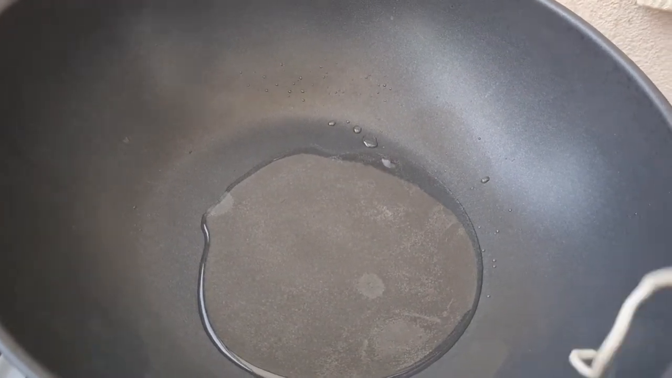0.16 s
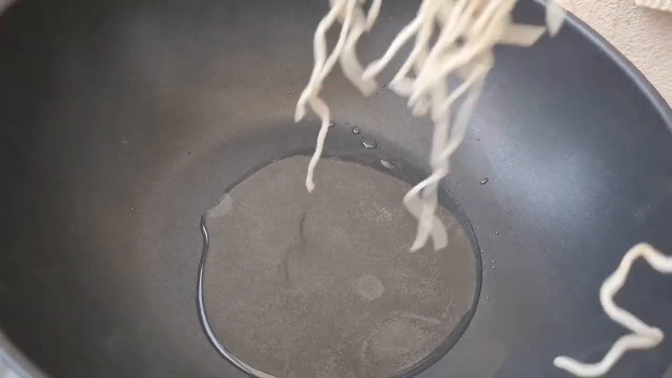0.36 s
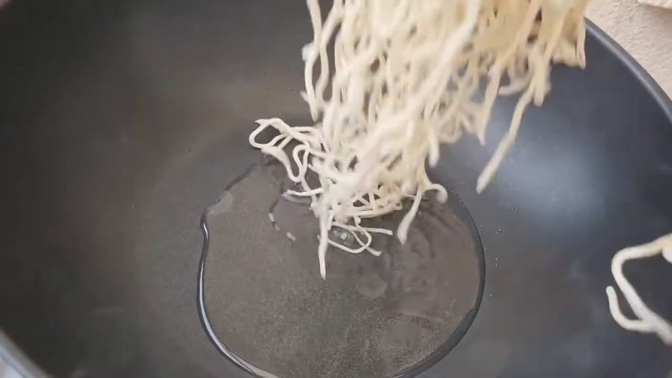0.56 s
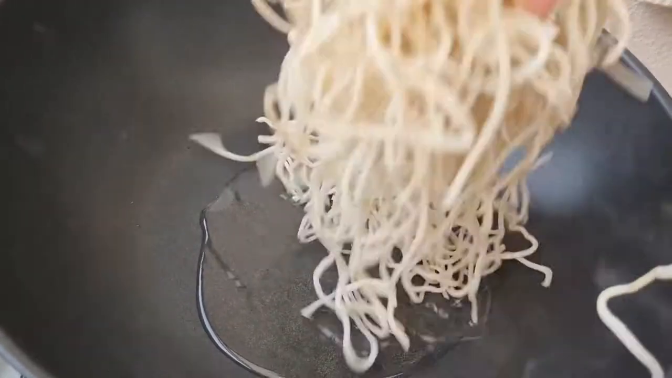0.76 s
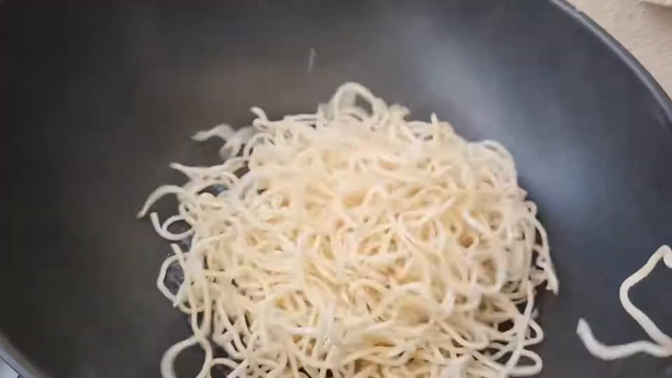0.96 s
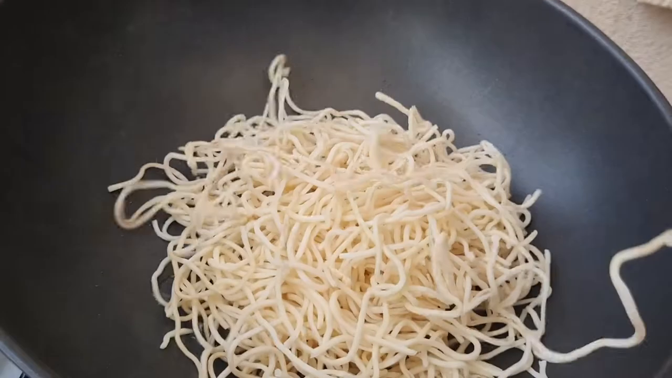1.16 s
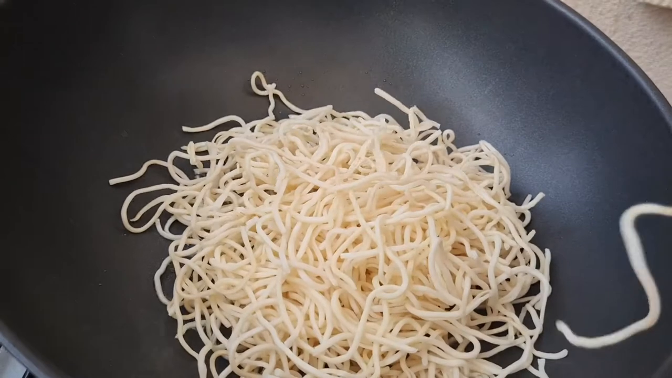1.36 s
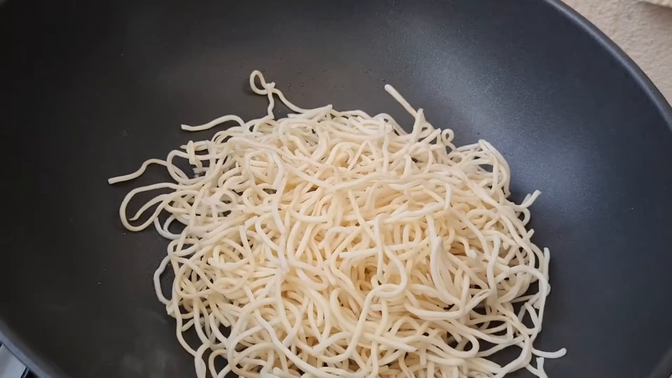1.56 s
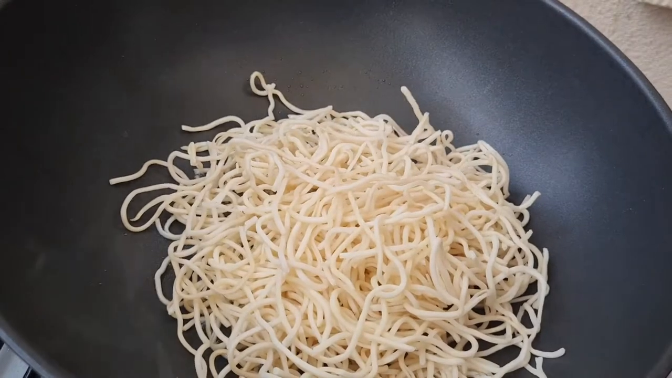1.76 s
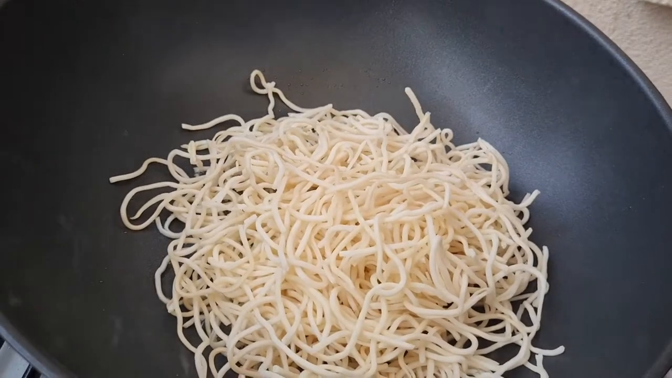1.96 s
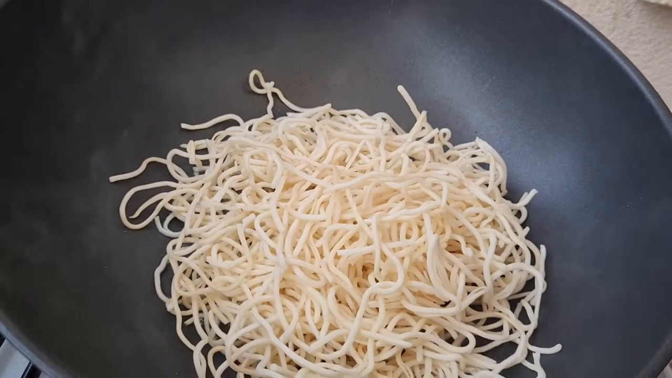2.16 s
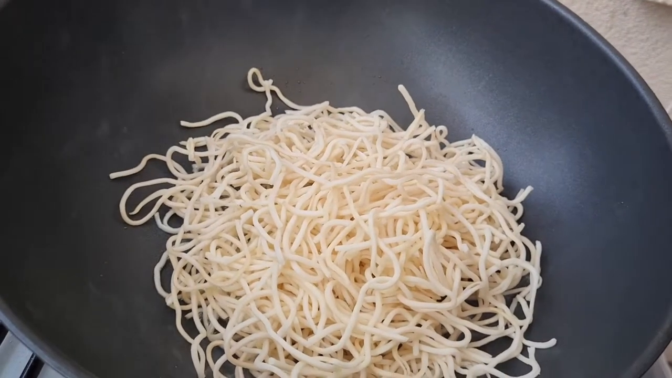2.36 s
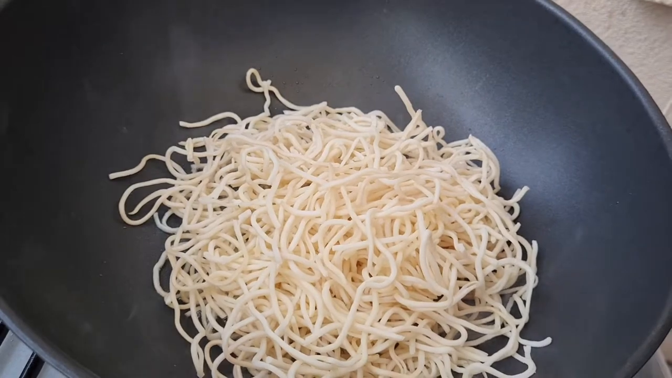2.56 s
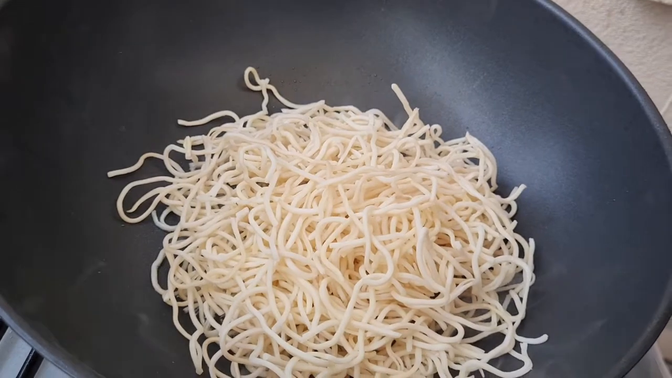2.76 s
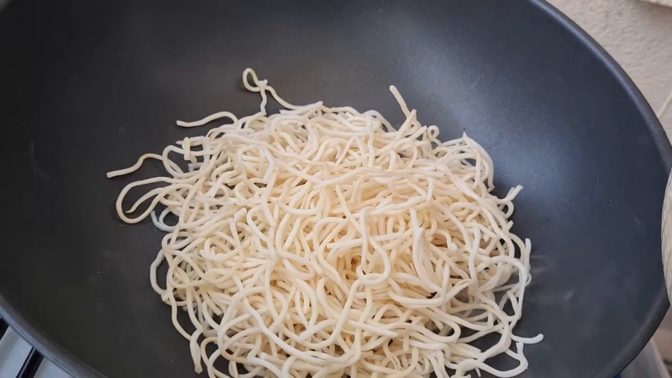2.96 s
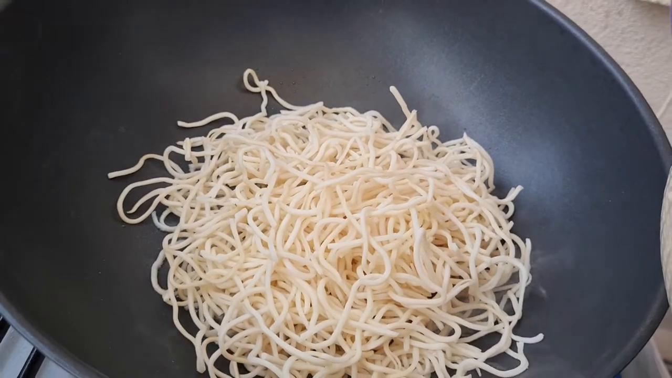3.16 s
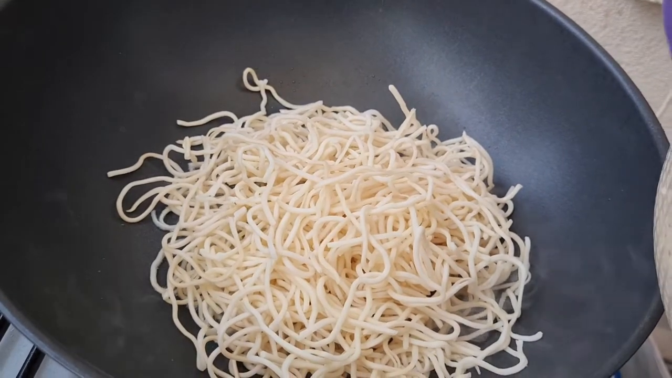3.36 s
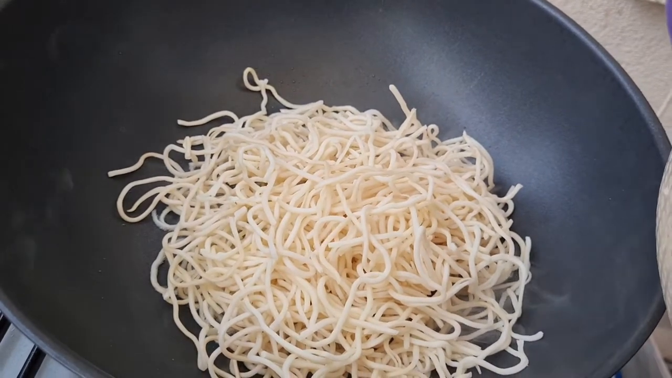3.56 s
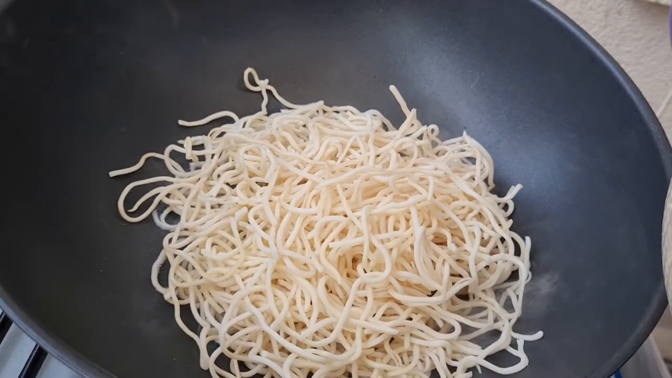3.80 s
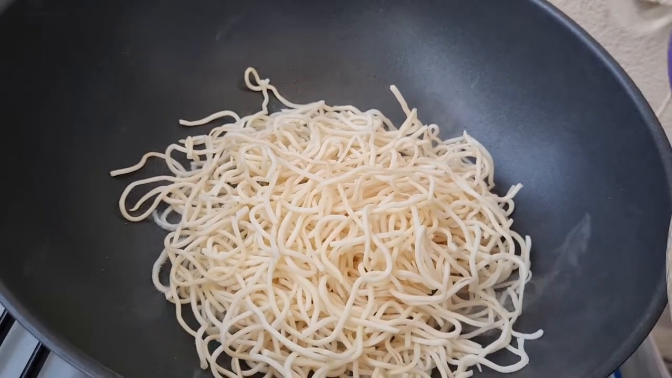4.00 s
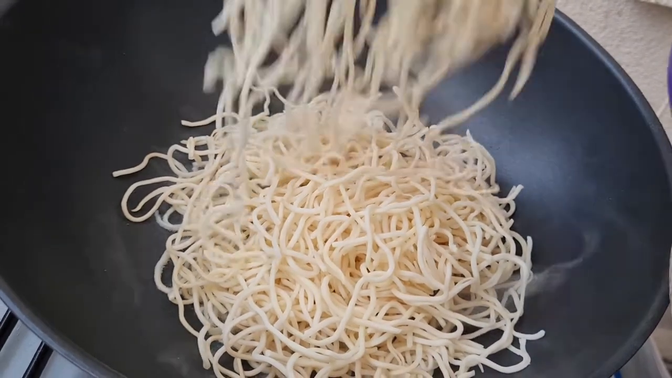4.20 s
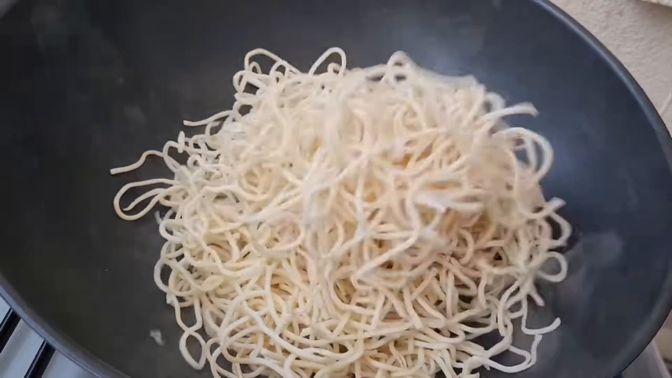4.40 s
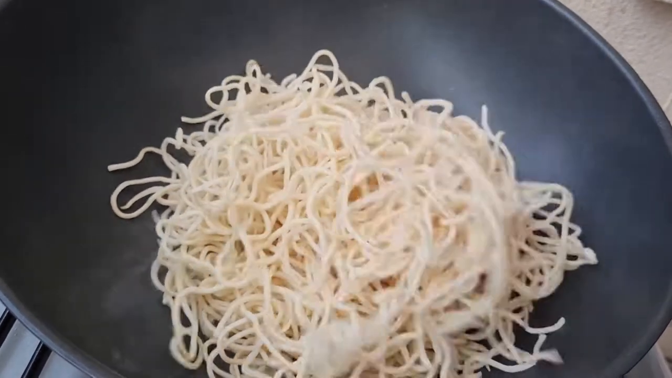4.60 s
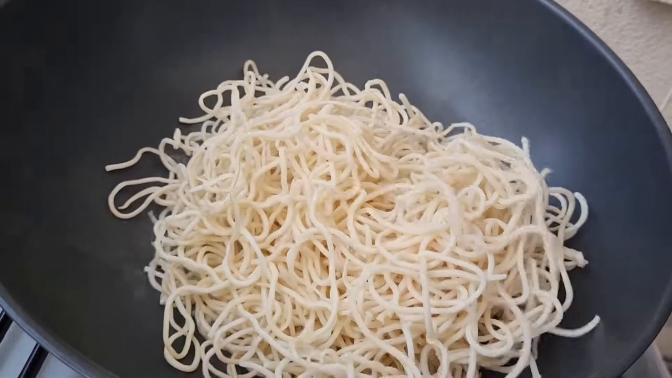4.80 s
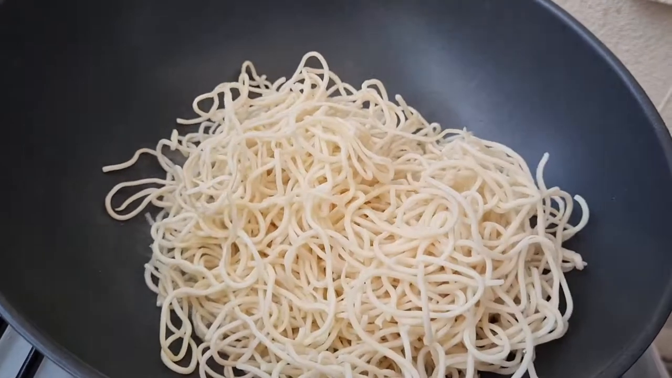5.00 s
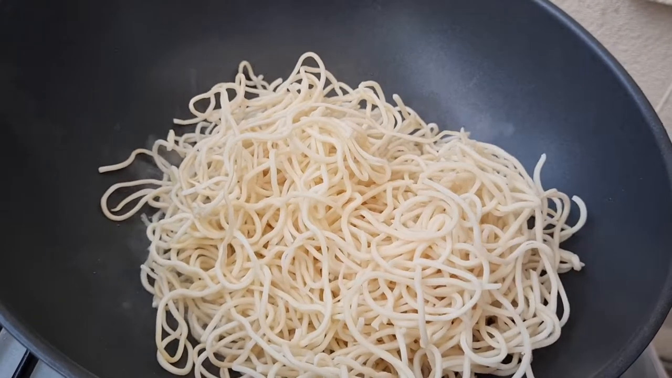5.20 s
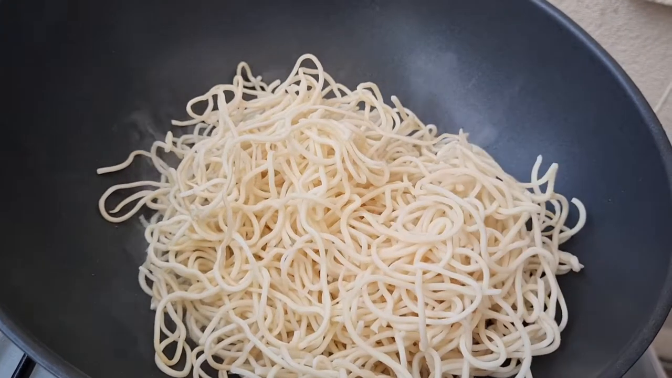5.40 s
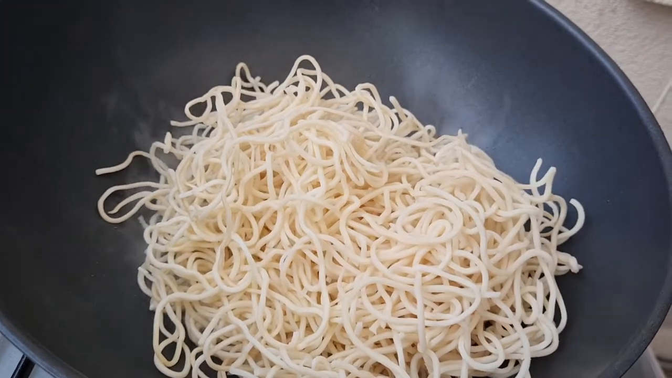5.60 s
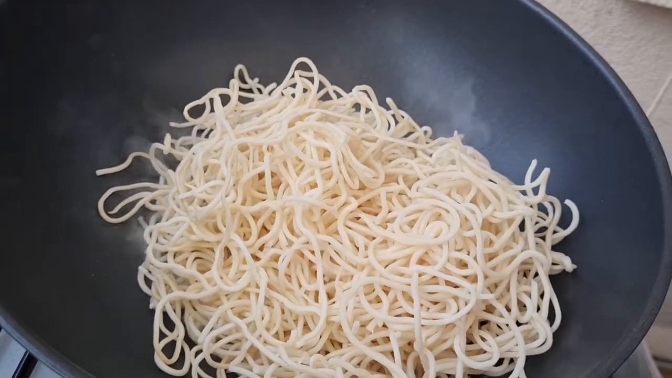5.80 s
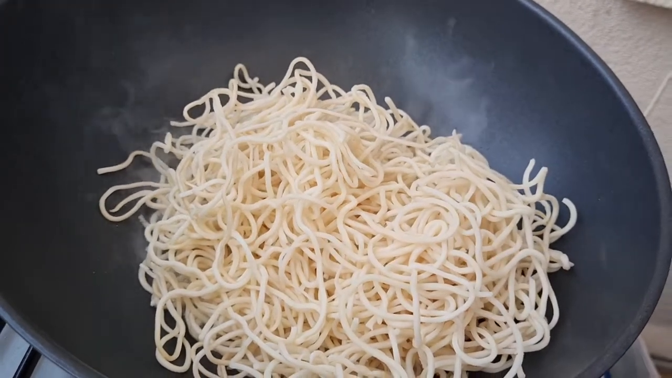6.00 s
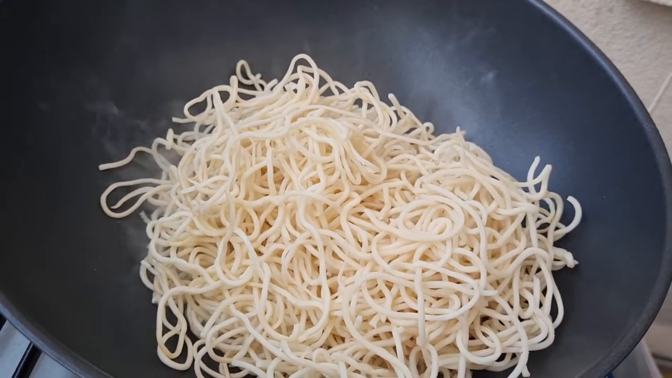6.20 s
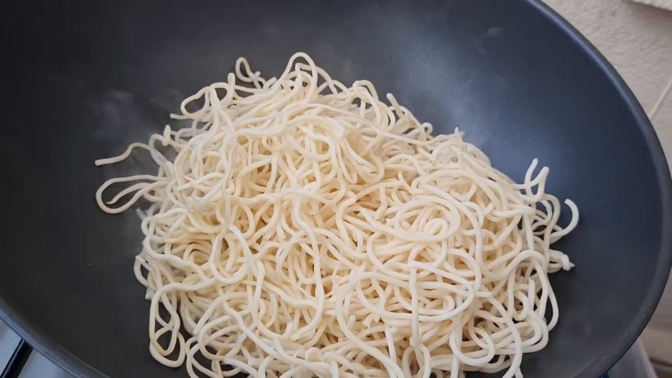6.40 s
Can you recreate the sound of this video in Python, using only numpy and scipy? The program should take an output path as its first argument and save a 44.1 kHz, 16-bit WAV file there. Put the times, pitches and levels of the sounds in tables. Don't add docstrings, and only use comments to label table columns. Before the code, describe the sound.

A home kitchen heard very close in stereo. For nearly the first second there is only a soft, low extractor and gas-flame hum, with a faint hiss at about 0.2 s and several quick, growing hisses from 0.55 s as strands touch the oil. At about 1 s the wet noodle heap lands: a dull low pan thud and an abrupt bright rush of steam. Sizzling builds quickly to full strength by 1.5 s, fine crackle over a coarser bubbling boil. Sharp millisecond spits, mostly leftward, and short liquid pops stay scattered throughout. Low pan thuds come at 2.3 and 3 s. The sizzle catches momentarily near 3.25 s and thins around 4 s. At 4.35 s a second handful makes the boil swell, with a strong pop and faint thud near 4.6 s. It dips around 5.3 s, then continues crackling, gradually softening, until 6.4 s.

```python
import sys
import numpy as np
from scipy import signal
from scipy.fft import rfft, irfft, next_fast_len
from scipy.io import wavfile

SR = 44100
rng = np.random.default_rng(int(sys.argv[2]) if len(sys.argv) > 2 else 0)


def field_ratio(decibels):
    return 10 ** (np.asarray(decibels, dtype=float) / 20)


def store_pcm(level_fs):
    pcm = np.round(np.clip(level_fs, -1, 1) * 32767).astype(np.int16)
    wavfile.write(sys.argv[1], SR, np.atleast_2d(pcm).T)


N = 284445


def rms_one(x):
    return x / np.sqrt(np.mean(x ** 2) + 1e-20)


def in_time(rows):
    s, *columns = np.transpose(rows)
    return [np.interp(np.arange(N) / SR, s, c) for c in columns]


def at_hz(points, hz):
    hz_points, values = np.transpose(points)
    return np.interp(np.log(hz), np.log(hz_points), values)


def drift(rate):
    r = np.exp(-2 * np.pi * rate * 40 / SR)
    white = rng.standard_normal(N // 40 + 2002)
    slow = signal.lfilter([1], [1, -2 * r, r * r], white)[2000:]
    return np.interp(np.arange(N) / 40, np.arange(len(slow)), rms_one(slow))


def dying(clicks, t60):
    return signal.lfilter([1], [1, -field_ratio(-60 / (t60 * SR))], clicks + 1e-18)


# frequency in Hz, correlation from 0 to 1.
LIKENESS = [(60, 0.5), (180, 0.84), (550, 0.58), (1650, 0.46), (4970, 0.043), (15000, 0.14)]
# frequency in Hz, left over right in dB.
LEAN = [(60, -1), (150, 3.5), (380, 0.5), (950, 3.5), (2380, 3), (5980, 2), (15000, 10)]


def stereo(mid, side, hz):
    alike = np.clip(at_hz(LIKENESS, hz), -1, 1)
    pair = np.sqrt(1 + alike) * mid + np.sqrt(1 - alike) * side * [[1], [-1]]
    return pair * field_ratio(at_hz(LEAN, hz) * np.array([[.5], [-.5]]))


def wash(spectrum):
    size = next_fast_len(N)
    hz = np.arange(size // 2 + 1) * SR / size + 1e-3
    mid, side = rfft(rng.standard_normal((2, size)))
    coloured = stereo(mid, side, hz) * field_ratio(at_hz(spectrum, hz))
    return rms_one(irfft(coloured, size)[:, :N])


def bank(spectrum, patchy_db, patch_rate, gate):
    out, edges = 0, 22 * 2 ** np.arange(0, 9.7, .5)
    white = rng.standard_normal((2, 2, N))
    for k, (low, high) in enumerate(zip(edges, edges[1:])):
        hz = np.sqrt(low * high)
        if not .7 * spectrum[0][0] < hz < 1.3 * spectrum[-1][0]:
            continue
        mid, side = white[k % 2]
        sos = signal.butter(2, [low, high], "band", fs=SR, output="sos")
        band = signal.sosfilt(sos, stereo(mid, side, hz) * gate(hz))
        out = out + field_ratio(at_hz(spectrum, hz) + patchy_db * drift(patch_rate)) * band
    return rms_one(out)


# frequency in Hz, density in dB per Hz.
HUM = [(15, -44), (25, -11), (37, -18), (59, -8.5), (76, -11.5), (180, -18.5), (245, -13.5), (400, -23.5),
       (872, -4.5), (1120, -14.5), (1400, -6.5), (1640, -30), (1900, -29), (2470, -64), (4180, -120)]
# frequency in Hz, density in dB per Hz.
SEETHE = [(1700, -40), (2000, -8), (2400, -14), (4000, -15), (4400, -1), (5300, -0.5), (6200, -11),
          (7600, -6), (8300, -6), (8850, -6), (9500, -14), (10250, 0), (11200, -11), (15400, -16)]
# time in seconds, level in dB.
RUMBLE = [(0.0, -73), (2.24, -67), (2.32, -48), (2.73, -67), (3.09, -48.5), (3.16, -65.5), (5.06, -56.5),
          (5.14, -67), (5.86, -54), (6.45, -68)]
HUM_DB, SEETHE_DB = -64, -72.5


def hum():
    (rumble_db,) = in_time(RUMBLE)
    sos = signal.butter(2, [45, 60], "band", fs=SR, output="sos")
    flutter = signal.sosfilt(sos, rng.standard_normal(N))
    air = field_ratio(HUM_DB + 0.67 * drift(8.3)) * wash(HUM)
    seethe = field_ratio(SEETHE_DB) * wash(SEETHE)
    return air + seethe + field_ratio(rumble_db - 8.0) * rms_one(flutter)


def kitchen(x):
    t60_s, wall_cut_hz = 0.2, 14000
    size = next_fast_len(N + SR)
    hz = np.arange(size // 2 + 1) * SR / size
    dull = 1 / (1 + 1j * hz / wall_cut_hz)
    out = np.zeros((2, len(hz)), complex)
    for k, lag in enumerate(rng.uniform(.003, 0.023, 10)):
        turn = field_ratio(-60 * lag / t60_s) * dull * np.exp(-2j * np.pi * hz * lag)
        out[k % 2] += turn / (1 - turn) * (-1) ** (k // 2)
    return irfft(out * rfft(x, size), size)[:, :N]


# frequency in Hz, width in Hz, gain in dB.
COMB = [(125, 27, 4), (183, 66, -7), (235, 12, 7), (305, 11, 5.5), (391, 106, -11), (424.5, 26, 6),
        (918, 50, 3.5), (1125, 116, -11.5), (1640, 53, -3), (1993, 36, 2), (7720, 770, 3)]


def comb(x):
    for hz, width_hz, gain_db in COMB:
        r = np.exp(-np.pi * width_hz / SR)
        zeros = np.array([1, 0, -1]) * (1 - r * r) / 2
        poles = [1, -2 * r * np.cos(2 * np.pi * hz / SR), r * r]
        x = x + (field_ratio(gain_db) - 1) * signal.lfilter(zeros, poles, x)
    return x


def bursts(events, spectrum, rise_s):
    t, shape = np.arange(N) / SR, 0
    for s, peak_db, t60 in events:
        decay = field_ratio(peak_db - 60 * np.clip(t - s, 0, 9) / t60)
        shape = shape + decay * np.clip((t - s) / rise_s, 0, 1)
    return shape * field_ratio(1.3 * drift(150)) * wash(spectrum)


# start in seconds, peak in dB, 60 dB decay in seconds.
THUDS = [
    (0.98, -53.5, 1),
    (2.292, -49.5, 0.68),
    (2.963, -51.5, 0.85),
    (4.576, -64, 0.53),
]
# frequency in Hz, density in dB per Hz.
THUD = [(24, -32), (40, -5), (119, 1), (212, 0.5), (304, -6), (399, -1.5), (600, -7), (780, -29),
        (1320, -120)]


def thuds():
    return bursts(THUDS, THUD, rise_s=0.0056)


# start in seconds, peak in dB, 60 dB decay in seconds.
TOUCHES = [(.165, -69, 0.35), (.545, -72, 0.35), (.635, -69, 0.11), (.66, -76, 0.19), (.74, -70, .1),
           (.797, -63, 0.2), (.813, -53.5, 0.29), (.865, -60.5, 0.48), (.916, -55.5, .5), (.945, -62, .3),
           (.962, -51, .2)]
# frequency in Hz, density in dB per Hz.
TOUCH = [(1060, -38), (1800, -13), (2580, -14), (3790, -6.5), (4260, 0), (5430, -3), (6050, -6),
         (7850, -10), (15400, -20)]


def touches():
    return bursts(TOUCHES, TOUCH, rise_s=0.0022)


# start in seconds, peak in dB, 60 dB decay in seconds.
FLASHES = [
    (.9775, -28, 0.18),
    (.9775, -29.5, 0.42),
]
# frequency in Hz, density in dB per Hz.
FLASH = [(1180, -53), (2000, -27), (2910, -17.5), (3090, -27), (3400, -9.5), (3670, -13), (4100, -4.5),
         (6960, -1.5), (15400, -20)]


def flashes():
    return bursts(FLASHES, FLASH, rise_s=0.00047)


# start in seconds, peak in dB, pitch in Hz.
POPS = [(1.212, -34, 2450), (1.283, -38, 2070), (1.415, -33, 1610), (1.468, -29, 2060), (1.776, -21, 1040),
        (2.183, -27, 1790), (2.531, -27, 1790), (2.641, -21.5, 1900), (3.003, -31, 2360),
        (3.161, -37, 2040), (3.421, -31, 1460), (3.641, -26.5, 1650), (3.889, -26, 2370), (4.243, -35, 960),
        (4.585, -26, 1490), (4.591, -33, 1550), (4.629, -16.5, 1980), (4.786, -26, 2330),
        (4.821, -21, 2380), (5.025, -30, 1350), (5.12, -22, 2380), (5.555, -36, 2550), (5.612, -27, 2230),
        (5.7, -21, 2020), (6.112, -22.5, 2160), (6.151, -25.5, 1330)]


def pops():
    out, t = np.zeros(N + 2048), np.arange(2048) / SR
    luck = rng.standard_normal((len(POPS), 2048))
    for (s, peak_db, hz), noise in zip(POPS, luck):
        cycles = hz * t * (1 + 25 * t)
        swell = np.minimum(hz * t / .3, 1)
        ring = field_ratio(-60 * hz * t / 6.0) * np.sin(2 * np.pi * cycles)
        sos = signal.butter(1, [hz * 1.04, hz * 2.0], "band", fs=SR, output="sos")
        gurgle = signal.sosfilt(sos, noise) * field_ratio(-60 * t / 0.041)
        at = round(s * SR)
        out[at:at + 2048] += swell * field_ratio(peak_db + 3.5) * (ring + 0.73 * gurgle)
    return signal.sosfilt(signal.butter(2, 400, "high", fs=SR, output="sos"), out[:N])


LANDING_S, HANDFUL_S = .96, 4.33
BOIL_DB, BOIL_START_DB, BOIL_BUILD_S, BOIL_FADE_DB_PER_S = -46.5, -10.5, 0.33, 0.31
HANDFUL_DB, HANDFUL_RISE_S, HANDFUL_EASE_S = 5.0, 0.031, 0.76


def boil_level():
    t = np.arange(N) / SR
    since, pressed = np.maximum(t - LANDING_S, 0), np.maximum(t - HANDFUL_S, 0)
    build_db = BOIL_START_DB * np.exp(-since / BOIL_BUILD_S)
    swell = (1 - np.exp(-pressed / HANDFUL_RISE_S)) * np.exp(-pressed / HANDFUL_EASE_S)
    return BOIL_DB + build_db - BOIL_FADE_DB_PER_S * since + HANDFUL_DB * swell


def small_pops():
    count, level, centre_hz, spread_octaves, ring_cycles = 150, -40, 2003, 0.203, 45
    when = rng.random(count) ** 1.4
    size, pitch = rng.standard_normal((2, count))
    starts = (LANDING_S * SR + when * (N - 1 - LANDING_S * SR)).astype(int)
    pitches = centre_hz * 2 ** (spread_octaves * pitch)
    out, t = np.zeros(N + 2048), np.arange(2048) / SR
    boil_db = boil_level() - BOIL_DB
    for at, db, hz in zip(starts, 3.1 * size, pitches):
        ring = field_ratio(-60 * hz * t / ring_cycles) * np.sin(2 * np.pi * hz * t * (1 + 6.0 * t))
        out[at:at + 2048] += field_ratio(level + db + boil_db[at]) * np.minimum(t / 0.00095, 1) * ring
    return out[:N]


def small_spits():
    count, from_s = 110, 1.32
    when = rng.random(count)
    size, wet, long = rng.standard_normal((3, count))
    s = from_s + (np.arange(count) + when) / count * (N / SR - from_s)
    lively_db = np.interp(s, *np.transpose(FRY)) + 37
    peak_db = -20 + 3 * np.clip(size, -3, 1.5) + 0.44 * lively_db
    length_ms = .4 * 2 ** (0.25 * long)
    puff_db = -28.5 + 4.43 * wet
    return list(zip(s, peak_db, length_ms, puff_db))


# start in seconds, peak in dB, length in ms,
# steam puff relative to the peak in dB.
SPITS = [(1.5129, -16, .7, -20), (1.5914, -9.5, 0.43, -30), (4.494, -14.5, .6, -23),
         (1.7772, -10.5, 1.5, -21), (1.8202, -10, .7, -24), (1.948, -8, .8, -20), (1.963, -8.5, 1.6, -20.5),
         (2.3024, -12, 0.4, -21), (2.3705, -8, .6, -22.5), (2.5415, -11.5, .8, -26),
         (3.0036, -11, .45, -24), (3.1646, -10.5, 0.71, -24), (3.3894, -10.5, 0.79, -30),
         (3.92, -10.5, .55, -25), (4.0484, -11.5, .6, -30), (4.3668, -12.5, .7, -17),
         (4.5916, -13, .8, -21), (4.654, -12.5, .46, -23), (4.7547, -7.5, .45, -22),
         (5.0588, -7, 0.51, -22.5), (5.192, -11, .4, -35), (5.5555, -7, 0.59, -26), (5.5677, -10, .55, -26),
         (5.613, -8, .5, -26), (5.623, -11, 1.1, -23), (5.9003, -13, 0.73, -32), (5.9821, -13, .6, -27),
         (6.0606, -14, 0.83, -29), (6.1398, -11, .8, -28), (6.199, -13, .45, -26)]


def spits():
    out, t = np.zeros((2, N + 2048)), np.arange(2048) / SR - .001
    drops = list(SPITS) + small_spits()
    luck = rng.standard_normal((len(drops), 2, 2048))
    place = rng.random((len(drops), 2))
    for (s, peak_db, ms, puff_db), noise, (size, side) in zip(drops, luck, place):
        crack = np.exp(-np.abs(t) / np.where(t < 0, .00012, .00055 * max(ms, .1)))
        low_hz = min(4500 * 2 ** (2.4 * size), 12000)
        burst = signal.sosfilt(signal.butter(2, low_hz, "high", fs=SR, output="sos"), noise * crack)
        burst = burst / np.abs(burst).max(axis=1, keepdims=True)
        burst = burst * field_ratio([[0], [-9 - 7 * side]])
        steam = field_ratio(puff_db - 60 * np.abs(t) / 0.077) * np.clip(t / 0.00092, 0, 1)
        puff = noise * steam * field_ratio([[0], [-5]])
        at = round((s - .0012) * SR)
        out[:, at:at + 2048] += field_ratio(peak_db + 6.5) * (burst + puff)
    return signal.sosfilt(signal.butter(2, 3000, "high", fs=SR, output="sos"), out[:, :N])


def bursting(per_s, spread_db, t60, smooth_left, smooth_right):
    sizes = field_ratio(spread_db * np.minimum(rng.exponential(1, N), 2.8))
    born = rng.random(N) < per_s * field_ratio(3 * drift(30)) / SR
    smooth = np.array([[smooth_left], [smooth_right]])
    bubbles = rms_one(dying(sizes * born, t60))
    return np.sqrt((smooth ** 2 + bubbles ** 2) / (smooth ** 2 + 1))


# time in seconds, sizzle level in dB.
FRY = [(0.96, -54), (1.12, -42), (1.25, -37.5), (1.45, -36), (1.85, -35.5), (2.05, -34), (2.22, -36.5),
       (2.35, -34), (2.5, -36.5), (3.15, -37), (3.55, -37), (3.97, -39.5), (4.1, -37.5), (4.4, -36),
       (5.0, -36), (5.28, -39.5), (5.42, -37), (6.45, -40)]
# frequency in Hz, density in dB per Hz.
SIZZLE = [(1180, -42), (2000, -1), (2580, -0.5), (5160, 0), (6560, 0.5), (7780, -12.5), (8920, -1),
          (12100, 1.5), (14900, -0.5), (15400, -2)]
# frequency in Hz, density in dB per Hz.
BOIL = [(120, -15.5), (200, -12), (384, -10.5), (446, -4), (923, -4), (1100, 1), (1360, 5.5), (4000, -7),
        (5200, -3), (8800, -120)]
LULL_S, LULL_WIDTH_S, LULL_DB = 3.255, 0.025, -6.5


def sizzle():
    t = np.arange(N) / SR
    (sizzle_db,) = in_time(FRY)
    lull_db = LULL_DB * np.exp(-((t - LULL_S) / LULL_WIDTH_S) ** 2)
    landed = np.clip((t - .962) / 0.021, 0, 1)
    fine = bursting(per_s=700, spread_db=7.0, t60=0.0028, smooth_left=0.85, smooth_right=7.1)
    middle = bursting(per_s=650, spread_db=7.5, t60=0.0048, smooth_left=1.2, smooth_right=2.3)
    coarse = bursting(per_s=340, spread_db=-1.0, t60=0.033, smooth_left=0.9, smooth_right=2.1)
    bright = bank(SIZZLE, 1.86, 8.0, lambda hz: fine if hz > 6000 else middle)
    dull = bank(BOIL, 2.06, 21.6, lambda hz: coarse)
    frying = field_ratio(sizzle_db + 3.5) * bright + field_ratio(boil_level() + 2.0) * dull
    return landed * field_ratio(lull_db) * frying


def scene():
    bubbles = (pops() + small_pops()) * field_ratio(np.array([[.6], [-.6]]))
    near = spits() + bubbles
    echo = field_ratio(-10.5) * kitchen(near.mean(axis=0))
    steam = touches() + flashes()
    return comb(near + echo + steam + thuds() + sizzle()) + hum()


def top_cut(x):
    return signal.sosfilt(signal.butter(12, 16820, fs=SR, output="sos"), x)


def record(dry):
    ports = np.array([dry[0], np.pad(dry[1], (6, 0), "edge")[:N]])
    held = .55 * np.tanh(ports / .55)
    cut = signal.sosfilt(signal.ellip(12, .5, 60, 15470, fs=SR, output="sos"), held)
    return top_cut(cut)


dry = scene()
out = record(dry)
store_pcm(out)
```